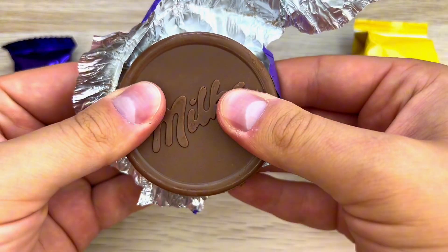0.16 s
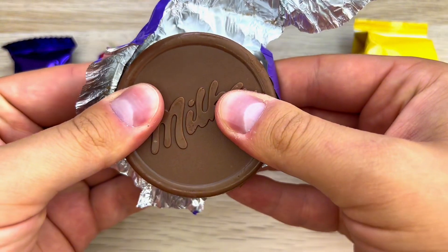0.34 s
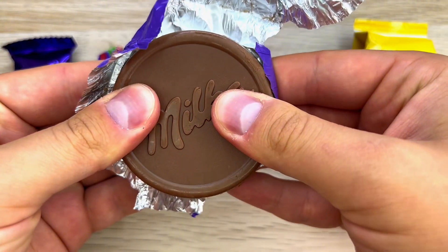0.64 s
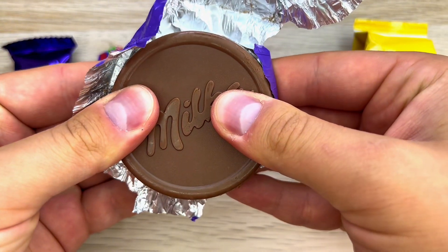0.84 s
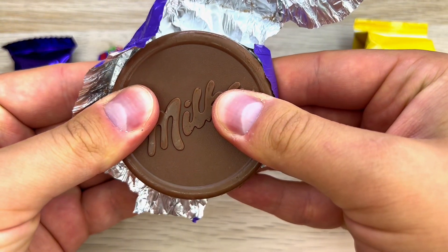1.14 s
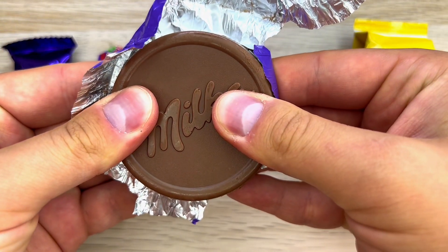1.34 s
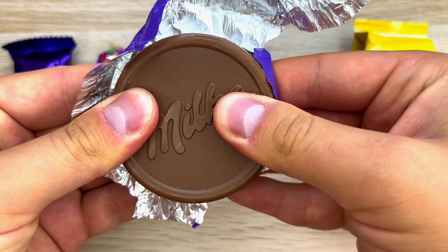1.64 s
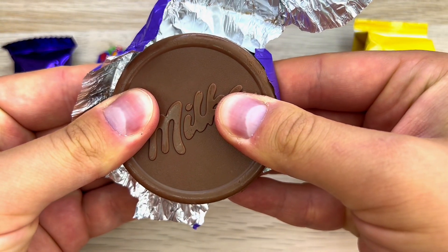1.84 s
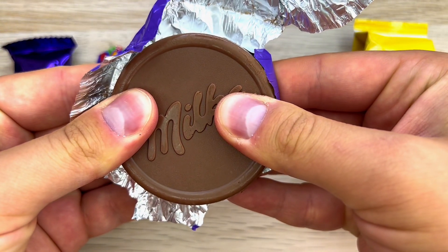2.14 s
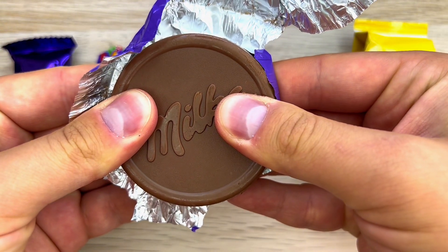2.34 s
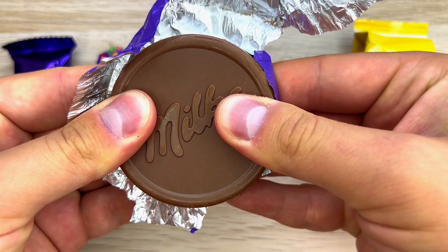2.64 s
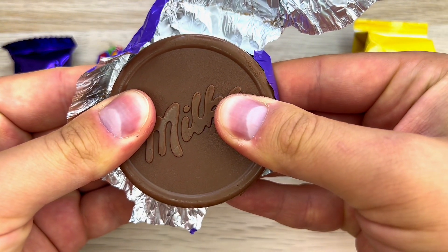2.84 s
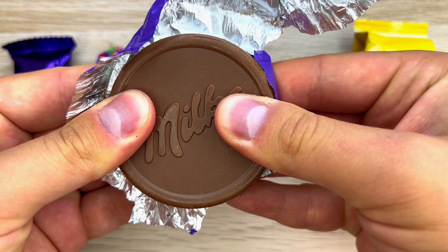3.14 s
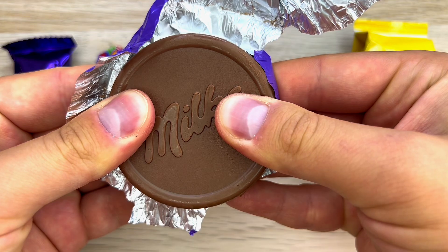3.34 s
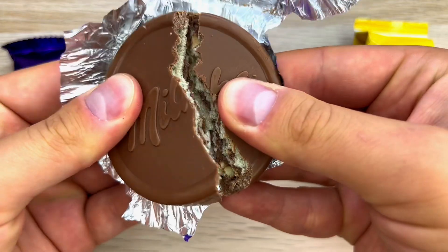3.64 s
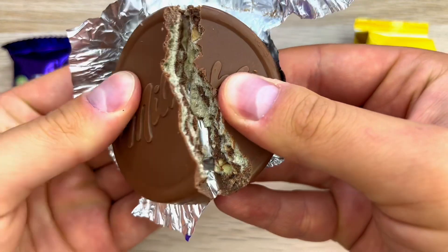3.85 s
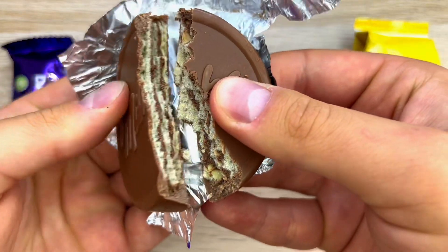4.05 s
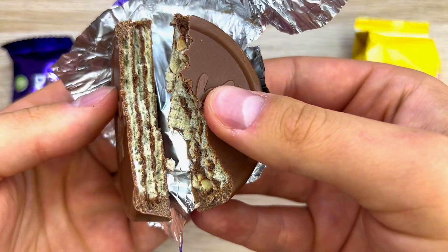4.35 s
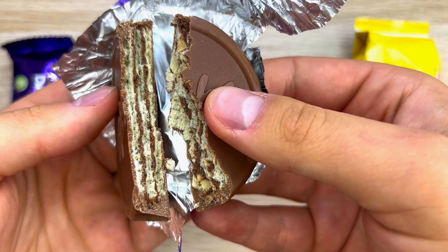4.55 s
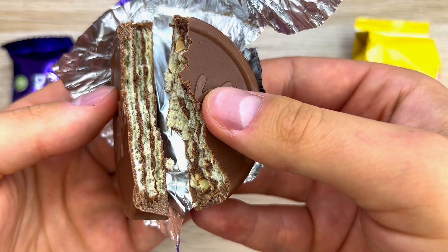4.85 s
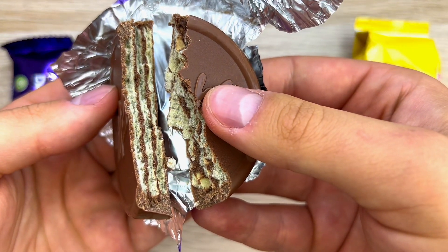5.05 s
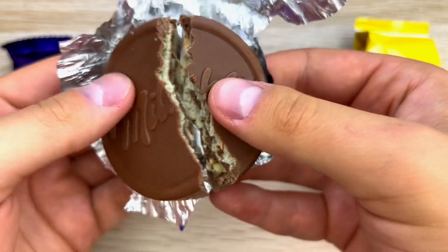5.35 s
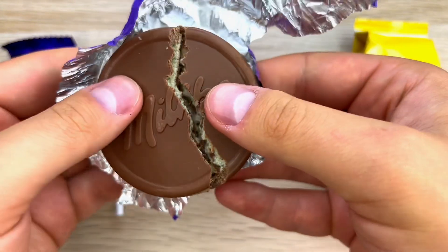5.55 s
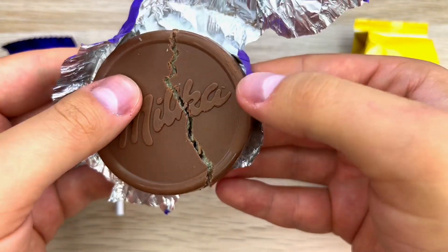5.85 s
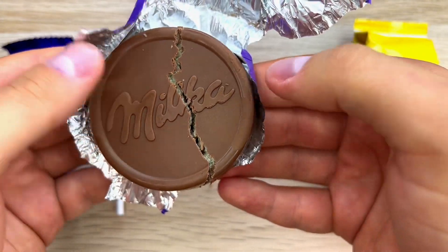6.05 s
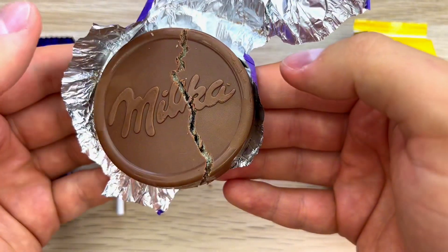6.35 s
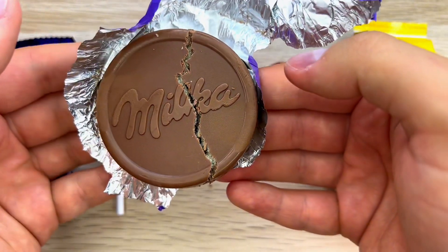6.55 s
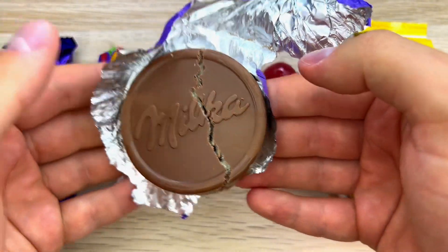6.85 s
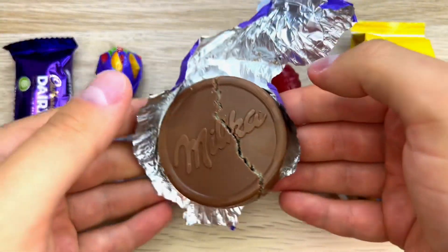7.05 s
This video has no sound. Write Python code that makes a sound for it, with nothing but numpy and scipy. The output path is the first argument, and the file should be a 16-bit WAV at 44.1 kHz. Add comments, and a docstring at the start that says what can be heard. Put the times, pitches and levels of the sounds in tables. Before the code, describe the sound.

Crisp foil crackles under pressing fingers, a chocolate wafer snaps and crunches apart, then is pushed back with clicks and a brief slide, in a quiet room.

```python
"""A quiet room, close under a pair of microphone ports: two hands bend, snap and fold back a chocolate wafer in foil.
Low hum and steady hiss are shaped noise; soft hand thuds are short low tones with scuffing noise.
Sliding is a swish of tiny slips that rings the hollows under the foil.
Crackle and wafer crunches are crowds of small buckles; sharp snaps are single noise bursts that ring the foil.
"""
import sys
import numpy as np
from scipy import signal
from scipy.fft import rfft, irfft, next_fast_len
from scipy.io import wavfile
from scipy.ndimage import uniform_filter1d

SR = 44100
rng = np.random.default_rng(int(sys.argv[2]) if len(sys.argv) > 2 else 0)


def transcribe(u):
    """Save the signal u as a 16-bit wav file named by the first command-line argument.

    u: samples, shape (n,) or (channels, n), limited to [-1, 1]; the rate is SR.
    q: integer samples, one column per channel.
    """
    v = np.clip(np.atleast_2d(u).T, -1, 1)
    q = np.round(v * 32767).astype(np.int16)
    wavfile.write(sys.argv[1], SR, q)


N = 317079  # length in samples

# Low room hum: (frequency [Hz], relative level [dB per Hz])
HUM_TONE = [(24, -35), (40, 8), (203, -3), (257, -6.5), (490, -14), (593, -14.5), (790, -21.5),
            (1100, -15.5), (2000, -32), (22000, -120)]
# How loud the hum is in the port sum: (time [s], level [dB])
HUM_LEVEL = [(5.5, -59), (5.9, -65.5)]
# Steady air noise: (frequency [Hz], relative level [dB per Hz])
HISS_TONE = [(710, -36), (1200, -7), (1680, 1), (1890, -1.5), (2590, -2.5), (5110, -9.5), (6090, -2),
             (7180, -11), (9190, -12), (11500, -13.5), (12200, -57.5)]
HISS_DB = -65  # level in the port sum
# Port difference against port sum for hum and hiss: (frequency [Hz], level [dB])
ROOM_PORTS = [(60, -14.5), (130, -4), (290, 1), (640, 12), (1410, -1), (3100, -2.5), (6820, -12.5),
              (15000, 12.5)]
# Port difference against port sum for a near source: (frequency [Hz], level [dB], phase [rad])
NEAR_PORTS = [(170, -4.5, -0.5), (520, -5, -2), (876, -5.5, -1.5), (1200, -8, -3), (1900, -36, 2),
              (2600, -8.5, -4), (2950, -2.5, -5.5), (3300, -11, -3.5), (3840, -7, -6), (4500, -1.5, -8),
              (5170, 3, -12.5), (5500, -10.5, -10.5), (6257, -13.5, -7.5), (7880, -17.5, -8),
              (10600, 1.5, -8), (12700, 11.5, -8), (16000, 22.5, -6.5), (15580, 26.5, -22.5)]
EDGE_HZ = 16800  # upper band limit

# Palms and wafer pushing air: (middle time [s], tone peak [dB], pitch at the middle [Hz])
THUDS = [(0.17, -39, 170), (3.445, -28, 145), (3.464, -32.5, 85), (3.48, -41, 150), (3.493, -31, 387),
         (3.52, -44, 73), (5.171, -39, 263), (5.302, -36, 170), (5.366, -32, 112), (5.386, -30.5, 237),
         (5.468, -31.5, 185), (5.484, -36.5, 90), (5.506, -25, 310), (5.528, -36.5, 90),
         (6.13, -44.5, 89.3), (6.915, -48, 300), (7.073, -43, 296), (7.1, -31, 265), (7.115, -37, 170)]

# Wafer and fingers sliding over the foil, one list a stroke: (time [s], level [dB])
SLIDES = [
    [(6.02, -56), (6.028, -43.5), (6.08, -29), (6.101, -20.5), (6.132, -47), (6.198, -50), (6.287, -78)],
    [(6.8, -50.5), (6.815, -48.5), (6.84, -33.5), (6.872, -44.5), (6.88, -38), (6.953, -36.5),
     (6.959, -25.5), (6.99, -40), (7.04, -45)],
    [(7.04, -46.5), (7.07, -42), (7.11, -39), (7.25, -49)],
]
# Colour of a tiny slip: (frequency [Hz], relative level [dB per Hz])
SLIP_TONE = [(180, -38), (300, -22), (713, -3), (1120, -7.5), (1390, -2.5), (4910, -1), (8220, 4),
             (11500, -3), (12500, -32), (16000, -33.5)]
# Hollows under the loose foil, first pinched shut, then laid in the palms:
# (base frequency [Hz], width [Hz], base level [dB])
HOLLOWS = [
    [(788, 100, 12.5), (1460, 53, 16), (3010, 160, 8), (4040, 130, 8)],
    [(1654, 91, 19.5), (1992, 200, 13), (3100, 110, 8), (3480, 113, 11)],
]
LAID_DOWN_S = 6.5  # time of the change from pinched to laid
# Hands closing and opening the hollows: (time [s], pitch factor [1], added level [dB])
CUPPING = [(6.02, 1.3, -5), (6.08, 0.96, -1), (6.1, 1.0, 5.5), (6.2, 0.98, -5.5), (6.82, 0.99, -10.5),
           (6.92, 0.98, 3.5), (6.96, 1.0, 0), (7.0, 1.02, -11.5), (7.11, 0.95, 4), (7.19, 1.05, 2.5)]

# Fingers pressing the foil, one list for bending and one for folding back:
# (time [s], bright crackle level [dB], part under 2.4 kHz against bright crackle [dB])
PRESSING = [
    [(0.0, -42.5, -15), (0.51, -56, -8.5), (0.75, -39.5, -6.5), (0.94, -50, -16.5), (1.55, -51, -17.5),
     (1.83, -49, -22), (2.18, -50.5, -19), (2.87, -39, -24), (2.98, -37, -31), (3.45, -42.5, -12.5),
     (3.98, -56.5, -12), (4.24, -65.5, -24)],
    [(5.145, -64, -20), (5.211, -62.5, -8.5), (5.333, -44, -13.5), (5.383, -39, -8.5), (5.457, -48, 5),
     (5.655, -47.5, -3), (5.789, -46, -11.5), (5.857, -61, -12), (5.97, -56, -8.5)],
]
# Wafer and crumpled foil crunching:
# (time of the top [s], level [dB], gathering time [s], settling time [s], part under 2.4 kHz against level [dB])
CRUNCHES = [(.165, -30.5, 0.012, 0.033, -23), (0.64, -29, 0.037, 0.022, -24),
            (0.721, -36, 0.015, 0.016, 3.5), (0.911, -33, 0.028, 0.014, -23),
            (1.245, -36.5, 0.022, 0.021, -8.5), (1.757, -34.5, 0.015, 0.061, -43),
            (1.884, -30.5, 0.026, 0.025, -15.5), (2.396, -37.5, 0.023, 0.084, -25.5),
            (2.651, -36, 0.03, 0.14, -19), (3.337, -26, 0.015, 0.055, -20),
            (3.436, -14.5, 0.012, 0.014, -6), (3.406, -16.5, 0.013, .014, -18),
            (3.647, -42.5, 0.1, 0.2, -7.5), (3.906, -42, 0.012, 0.086, -3),
            (4.126, -39, 0.025, 0.0098, 7.5), (5.16, -31.5, 0.0056, 0.014, 2),
            (5.257, -36.5, 0.016, 0.052, -4), (5.379, -27, 0.034, 0.0068, -3),
            (5.503, -33, 0.0032, 0.021, 5), (5.667, -14, 0.0051, 0.0045, -13.5),
            (5.771, -31, 0.037, 0.025, -20), (6.914, -36, 0.028, .03, -8.5)]
# Swarm of small buckles around a big one: levels for a 0 dB snap or pop, and dB of swarm per dB of peak
SWARM_SNAP_DB, SWARM_POP_DB, SWARM_SLOPE = -28, -22.5, 1.1
BUILD_S, SETTLE_S = 0.0014, 0.014  # the swarm gathers before the big buckle and settles after it

# Overall colour of the foil in the port sum: (frequency [Hz], relative level [dB per Hz])
FOIL_TONE = [(900, -19), (2000, -3.5), (2440, 5.5), (2990, 7.5), (3360, 4), (3740, 8), (4060, 3),
             (5120, 2.5), (5960, 6), (11000, 3.5), (13700, -8), (15800, -12.5), (17000, -39.5)]
# Larger patches of foil and wafer that give way: (time [s], peak [dB], ring [Hz])
POPS = [(0.0002, -33, 2056), (0.0541, -39, 2160), (0.1057, -38, 1460), (0.1143, -36, 2110),
        (0.1638, -17.5, 2130), (0.527, -35.5, 1610), (0.5326, -29, 2124), (0.6079, -22.5, 2140),
        (0.6569, -27, 1616), (0.6947, -28, 2150), (0.7115, -28.5, 700), (0.8618, -25.5, 2060),
        (0.9861, -37, 1850), (1.2301, -23, 1546), (1.3541, -40, 1580), (1.8167, -37.5, 1530),
        (1.8742, -25.5, 690), (2.0481, -26, 1115), (2.0847, -38, 1160), (2.3873, -37.5, 2160),
        (2.6849, -36.5, 603), (2.7083, -30.5, 1830), (2.8334, -38, 1690), (2.9294, -39, 1680),
        (2.9627, -36, 1867), (3.1578, -20, 974), (3.3419, -26.5, 2205), (3.4228, -17, 1590),
        (3.4334, -12.5, 1516), (3.5056, -17.5, 694), (3.6459, -14, 1583), (3.8282, -36, 1085),
        (3.8591, -36, 2247), (3.896, -22.5, 1626), (3.9414, -13.5, 1339), (3.9852, -13.5, 1420),
        (4.1126, -32, 980), (4.9237, -42, 2060), (5.152, -23.5, 1070), (5.1571, -22, 1038),
        (5.2903, -12.5, 777.5), (5.3667, -25.5, 673), (5.3732, -27, 678), (5.4248, -19, 1401),
        (5.4443, -12, 1071), (5.4555, -21.5, 704), (5.4602, -24, 715), (5.503, -21.5, 855),
        (5.5229, -24, 910), (5.5381, -23, 1207), (5.5989, -24.5, 844), (5.6272, -15, 1620),
        (5.6635, -14, 1510), (5.7394, -25.5, 1660), (5.7612, -25.5, 1572), (5.7758, -29.5, 1650),
        (6.0984, -14, 788.5), (6.8475, -23, 1620), (6.876, -25, 1760), (6.911, -21.5, 1990),
        (6.9554, -17.5, 2100)]
# Creases that buckle: (time [s], peak [dB], ring [Hz])
SNAPS = [(0.0004, -13.5, 3035), (0.0549, -16, 6820), (0.085, -15.5, 7890), (0.1069, -9, 6850),
         (0.1149, -21, 3953), (0.1254, -18.5, 7930), (0.156, -18.5, 8000), (0.1655, -2, 6720),
         (0.2113, -18.5, 8000), (0.2283, -20.5, 9030), (0.2802, -9.5, 6050), (0.299, -12, 7900),
         (0.3021, -19, 10700), (0.3114, -15.5, 7180), (0.3444, -13.5, 9730), (0.4295, -26, 4710),
         (0.4927, -36, 6015), (0.5122, -30.5, 6034), (0.528, -26.5, 9210), (0.5332, -21.5, 3790),
         (0.547, -21.5, 7950), (0.5599, -20.5, 3633), (0.6086, -10, 7960), (0.6186, -20.5, 6710),
         (0.631, -10.5, 6990), (0.6325, -12.5, 6930), (0.6382, -10.5, 7280), (0.6445, -13, 6880),
         (0.71, -19, 8030), (0.7123, -4, 11660), (0.725, -24.5, 7960), (0.7416, -20.5, 7580),
         (0.7995, -14.5, 7980), (0.8173, -23.5, 9200), (0.8347, -25.5, 6730), (0.8627, -7.5, 7960),
         (0.9736, -27.0, 6620), (0.984, -20.5, 6400), (0.987, -25.5, 3176), (1.0166, -29, 7000),
         (1.0711, -20.5, 6850), (1.0817, -19.5, 7920), (1.087, -19.5, 11650), (1.1453, -21.5, 5974),
         (1.166, -11, 9560), (1.2082, -25.0, 7800), (1.227, -21.5, 9620), (1.2303, -23, 2685),
         (1.2483, -17, 2956), (1.27, -22.5, 2820), (1.3086, -25.5, 6660), (1.3385, -27, 7100),
         (1.3547, -25.5, 2470), (1.4549, -27, 7800), (1.4589, -28.5, 7260), (1.4761, -25.5, 10480),
         (1.4832, -31, 6940), (1.5574, -22, 10750), (1.561, -24.5, 9280), (1.568, -23.5, 10590),
         (1.5765, -26.5, 10850), (1.6547, -28.5, 6960), (1.672, -19.5, 6970), (1.6744, -22.5, 6780),
         (1.7009, -21, 11530), (1.7353, -23.5, 7300), (1.744, -16, 7230), (1.7766, -24, 7200),
         (1.8177, -9, 6850), (1.866, -20.5, 7010), (1.872, -12.5, 3480), (1.884, -19, 7760),
         (1.889, -24.5, 7900), (1.907, -18, 7820), (1.9312, -15.5, 7070), (1.9615, -25, 7170),
         (1.988, -28, 8000), (2.0014, -31, 7320), (2.0476, -25.5, 2664), (2.0807, -27, 9170),
         (2.0863, -15, 8910), (2.1288, -24.5, 7230), (2.1652, -31.5, 11050), (2.1707, -25.5, 11120),
         (2.18, -29, 7320), (2.2248, -37, 6400), (2.234, -32.5, 7100), (2.2532, -26.5, 8400),
         (2.283, -29.5, 7110), (2.3007, -28.5, 7780), (2.33, -24, 5790), (2.3387, -24.5, 7980),
         (2.3511, -18.0, 6550), (2.3835, -13, 6440), (2.3883, -11.5, 2775), (2.4005, -17.5, 7990),
         (2.426, -21.5, 7060), (2.4533, -16, 6630), (2.4708, -21, 6530), (2.5057, -18.5, 5790),
         (2.613, -18.5, 7330), (2.6296, -18, 6720), (2.6893, -20.5, 6850), (2.6917, -21.5, 11600),
         (2.7088, -10, 11280), (2.7829, -18, 7170), (2.8129, -12.5, 7460), (2.8339, -19, 3637),
         (2.839, -15, 6000), (2.852, -20, 6010), (2.93, -18.5, 7040), (2.962, -11, 7460),
         (3.0025, -15, 5910), (3.053, -17.5, 10330), (3.1293, -23.5, 7400), (3.1402, -26.5, 7000),
         (3.1512, -12.5, 10390), (3.157, -5.5, 3617), (3.173, -21, 7210), (3.2065, -19.5, 8610),
         (3.231, -20, 8690), (3.2834, -14, 8710), (3.3133, -16, 6360), (3.326, -15.5, 6940),
         (3.3285, -11.5, 6890), (3.332, -13.5, 6940), (3.3396, -14, 6890), (3.342, -12, 6760),
         (3.3713, -10, 6750), (3.396, -7, 6610), (3.4231, -4.5, 5900), (3.4264, -5.0, 9490),
         (3.434, -6.5, 6290), (3.4415, -2, 8740), (3.4599, -11.5, 3610), (3.5067, -19.0, 2950),
         (3.5206, -22, 7010), (3.585, -27, 4870), (3.5905, -14.5, 7890), (3.5936, -8, 4840),
         (3.598, -10, 6580), (3.6027, -22, 7430), (3.6413, -11.5, 8590), (3.646, -6.5, 2412),
         (3.6889, -21.5, 7920), (3.7123, -18, 3777), (3.769, -21.5, 6360), (3.82, -22.5, 7880),
         (3.8244, -13.5, 10000), (3.8602, -13, 3770), (3.8865, -21.0, 7120), (3.8945, -12, 9410),
         (3.902, -15, 10770), (3.9295, -24, 7120), (3.9418, -10.5, 2305), (3.9851, -6, 5790),
         (4.0823, -21, 7800), (4.0865, -14.5, 8090), (4.1145, -11, 6580), (4.162, -29.5, 7980),
         (4.2072, -35, 7930), (4.411, -37, 7700), (4.5114, -38, 3070), (4.9243, -38.5, 2470),
         (5.1516, -28, 9230), (5.1587, -19, 10840), (5.1956, -21, 7940), (5.2016, -11.5, 6320),
         (5.2515, -17.0, 6010), (5.2574, -3, 5500), (5.291, -10.5, 3634), (5.307, -13.0, 5920),
         (5.3094, -14, 6700), (5.3245, -9, 8000), (5.378, -16.5, 6720), (5.4253, -9, 2670),
         (5.4443, -10.5, 2366), (5.4546, -13.0, 9000), (5.4591, -17, 4600), (5.4732, -17, 6010),
         (5.5075, -11, 7890), (5.524, -19.5, 7150), (5.5316, -10.5, 4006), (5.548, -10, 6610),
         (5.5667, -16, 3907), (5.623, -15.5, 5410), (5.6281, -20.5, 3470), (5.6562, -10.5, 4786),
         (5.6633, -4.5, 7200), (5.7405, -2.5, 6200), (5.772, -18.0, 7070), (5.7925, -18.5, 8000),
         (6.028, -23, 8070), (6.047, -16, 6160), (6.089, -7.5, 8330), (6.0943, -12, 9260),
         (6.0994, -6, 4065), (6.1008, -4.5, 7240), (6.549, -40.5, 4570), (6.8139, -22.5, 6660),
         (6.876, -18, 3060), (6.9546, -8.5, 3250), (6.9642, -16, 8260)]
ECHO_S, ECHO_DB = 0.0028, -13.5  # the table throws each buckle back


def amp(db):
    """Turns dB into a gain."""
    return 10 ** (np.asarray(db) / 20)


def evened(x):
    """Scales a signal to rms 1."""
    return x / np.sqrt(np.mean(x ** 2) + 1e-20)


def slow_noise(span):
    """Slow random drift of rms 1: noise averaged twice over a span of samples."""
    noise = rng.standard_normal(N)
    return evened(uniform_filter1d(uniform_filter1d(noise, span), span))


def read(points, hz, axis=1):
    """Reads one column of a table along log frequency."""
    table = np.transpose(points)
    return np.interp(np.log(hz + 1), np.log(table[0] + 1), table[axis])


def curve(rows):
    """Draws every column of a table against time, sample by sample."""
    s, *columns = np.transpose(rows)
    t = np.arange(N) / SR
    return [np.interp(t, s, c, left=c[0], right=c[-1]) for c in columns]


def during(tables):
    """Gives 1 while one of the gestures lasts, else 0."""
    t = np.arange(N) / SR
    return sum((t > rows[0][0]) & (t <= rows[-1][0]) for rows in tables)


def filtered(x, gain):
    """Multiplies the spectrum of the last axis by gain(Hz)."""
    size = next_fast_len(x.shape[-1] + 2048)
    spectrum = rfft(x, size) * gain(np.fft.rfftfreq(size, 1 / SR))
    return irfft(spectrum, size)[..., :x.shape[-1]]


def mode(hz, ring_hz, q):
    """One resonance that rings only after its push, with gain 1 at its own pitch."""
    return 1 / (1 + 1j * q * (hz / ring_hz - ring_hz / (hz + 1e-9)))


def colour(points, size=1024):
    """A filter with the table's spectrum that answers as promptly as possible (minimum phase)."""
    hz = np.abs(np.fft.fftfreq(size, 1 / SR))
    log_gain = np.log(amp(np.maximum(read(points, hz), -70)))
    return np.fft.ifft(np.exp(np.conj(signal.hilbert(log_gain)))).real


def ringing(x, hz, width):
    """A moving resonance of gain 1: shifts the pitch curve to zero, smooths, shifts back."""
    turn = np.exp(2j * np.pi * np.cumsum(hz) / SR)
    r = np.exp(-np.pi * width / SR)
    return 2 * (turn * signal.lfilter([1 - r], [1, -r], x / turn)).real


def hum_and_hiss():
    """Room noise comes from all sides, so port sum and port difference are unrelated noises."""
    out = 0
    for tone, level_db in ((HUM_TONE, curve(HUM_LEVEL)[0]), (HISS_TONE, HISS_DB)):
        a, b = rng.standard_normal((2, N))
        mid = filtered(a, lambda hz: amp(read(tone, hz)))
        side = filtered(b, lambda hz: amp(read(tone, hz) + read(ROOM_PORTS, hz)))
        out = out + amp(level_db) * np.array([mid + side, mid - side]) / np.std(mid)
    return out


def room(x, t60=0.19):
    """Two unrelated dying tails of sparse echoes of random sign; t60 is the time to fall 60 dB [s]."""
    count, gap = 700, 22  # one echo in every gap of 22 samples
    taps = np.zeros((2, gap * count))
    at = gap * np.arange(count) + rng.integers(0, gap, (2, count))
    sign = rng.choice([-1., 1.], at.shape)
    np.put_along_axis(taps, at, sign * amp(-60 * at / SR / t60), 1)
    taps = np.pad(taps, ((0, 0), (300, 0)))  # wait of 300 samples before the tail
    return signal.fftconvolve(x[None], taps / np.linalg.norm(taps[0]), axes=1)[:, :N]


def wandering(x, rad=1.0):
    """The hands move about under the ports, so the phase between them wanders (rms in rad)."""
    turn = slow_noise(900)
    return (signal.hilbert(x, next_fast_len(N))[:N] * np.exp(1j * rad * turn)).real


def thuds(cycles=2.5, rough=0.65, rumble=0.79):
    """Each push is a few soft low cycles that sag in pitch; the skin scuffs along and rumbles on."""
    size = 8192
    out = np.zeros(N + size)
    scuffs = rng.standard_normal((len(THUDS), size))
    for (s, db, hz), start, noise in zip(THUDS, rng.random(len(THUDS)), scuffs):
        u = np.arange(-1, 4, 2 * hz / cycles / SR)[:size]  # the tone lasts from -1 to 1
        tone = np.sin(2 * np.pi * (start + cycles / 2 * (u - 0.064 * u ** 2)))
        tone = np.cos(np.pi * u / 2) ** 2 * tone * (u < 1)
        scuff = evened(filtered(noise, lambda f: mode(f, 2.3 * hz, 0.73) ** 2))[:len(u)]
        rise = np.cos(np.pi * np.minimum(u, 0) / 2) ** 2
        fall = np.exp(-np.maximum(u, 0) / rumble)
        at = round((s - cycles / 2 / hz) * SR)
        out[at:at + len(u)] += amp(db) * (tone + rough * rise * fall * scuff)
    return out[:N]


def slide(per_s=3500, spread_db=1.0):
    """Crowded tiny slips blur into a grainy swish that rings the hollows under the foil."""
    size = amp(spread_db * rng.exponential(1, N))
    slips = size * (rng.random(N) < per_s / SR) * rng.choice([-1., 1.], N)
    drift = slow_noise(250)
    swish = signal.oaconvolve(slips * amp(0.57 * drift), colour(SLIP_TONE))[:N]
    pitch, depth_db = curve(CUPPING)

    def in_hollows(hollows):
        """The swish plus its ringing in each hollow."""
        rings = sum(amp(db + depth_db) * ringing(swish, hz * pitch, width) for hz, width, db in hollows)
        return evened(swish + rings)

    pinched, laid = in_hollows(HOLLOWS[0]), in_hollows(HOLLOWS[1])
    level = during(SLIDES) * amp(curve(sum(SLIDES, []))[0])
    return level * np.where(np.arange(N) < LAID_DOWN_S * SR, pinched, laid)


def bounced(rows):
    """Adds the table's echo and scales each row to peak 1."""
    late = round(ECHO_S * SR)
    rows = rows + amp(ECHO_DB) * np.pad(rows, ((0, 0), (late, 0)))[:, :rows.shape[1]]
    return rows / np.abs(rows).max(1, keepdims=True)


def knocks(low_hz, q, size=1536):
    """One row a larger patch: a softer noise burst that rings lower down."""
    t = np.arange(size) / SR
    low_hz = low_hz[:, None]
    push = rng.standard_normal((len(low_hz), size))
    push = push * (1 - np.exp(-(t / 0.00019) ** 2)) * amp(-60 * t / 0.016)
    return bounced(filtered(push, lambda hz: mode(hz, low_hz, 0.55) ** 2 * (0.27 + mode(hz, low_hz, q))))


def cracks(ring_hz, t60, broad, size=1536):
    """One row a buckle: a sudden dying burst rings a flat of foil; the sheet shivers on a little."""
    t = np.arange(size) / SR
    ring_hz = ring_hz[:, None]
    kick = rng.standard_normal((len(ring_hz), size)) * (1 - np.exp(-(t / 0.00039) ** 2))
    shiver = amp(-20.5 - 60 * t / 0.042)
    kick = kick * (amp(-60 * t / t60) + shiver)
    rung = filtered(kick, lambda hz: broad + 0.31 * mode(hz, ring_hz, 0.88) + mode(hz, ring_hz, 8.6))
    return bounced(signal.fftconvolve(rung, colour(FOIL_TONE)[None], axes=1)[:, :size])


def swell(t, gathers, settles):
    """Grows towards time 0 and dies away after it, with one time constant [s] for each side."""
    return np.exp(-np.abs(t) / np.where(t < 0, gathers, settles))


def swarms():
    """Bright and low crackle levels: finger pressure, a swarm around every snap and pop, and crunches."""
    press_db, share_db = curve(sum(PRESSING, []))
    power = during(PRESSING) * amp([press_db, press_db + share_db]) ** 2 + 1e-20
    shape = swell(np.arange(-SR // 4, SR // 4 + 1) / SR, BUILD_S, SETTLE_S)
    # snaps feed the bright crackle, pops the low one
    for k, (rows, swarm_db) in enumerate(((SNAPS, SWARM_SNAP_DB), (POPS, SWARM_POP_DB))):
        s, peak_db, _ = np.transpose(rows)
        at = np.round(s * SR).astype(int)
        hits = np.bincount(at, amp(swarm_db + SWARM_SLOPE * peak_db), N)
        power[k] += signal.oaconvolve(hits, shape, "same") ** 2
    for top, db, gathers, settles, part_db in CRUNCHES:
        near = slice(max(round((top - 0.5) * SR), 0), round((top + 0.5) * SR))
        crunch = swell(np.arange(N)[near] / SR - top, gathers, settles)
        power[:, near] += (amp([[db], [db + part_db]]) * crunch) ** 2
    return np.sqrt(power)


def crackle(count=24, spread_db=2.0):
    """Many small buckles of random size, in clumps; harder work crowds them."""
    bright, low = swarms()
    per_s = 480 * (bright / amp(-47.0)) ** 0.42
    u = rng.random((count, 2))
    high_sounds = cracks(5200 * 2.15 ** u[:, 0], 0.006, broad=0.06)
    low_sounds = knocks(700 * 5.5 ** u[:, 1], 4.2)
    clump = slow_noise(300)
    size = amp(spread_db * np.minimum(rng.exponential(1, N), 2.8) + 1.5 * clump)
    size = size * (rng.random(N) < per_s / SR)
    kind = rng.integers(0, count, N)  # which of the ready-made sounds each buckle uses

    def layer(sizes, sounds):
        """Places the sounds at the buckles, at an even overall level."""
        placed = [signal.oaconvolve(sizes * (kind == k), row[:1400])[:N] for k, row in enumerate(sounds)]
        return evened(sum(placed))

    high_layer = layer(size / np.sqrt(per_s), high_sounds)
    low_layer = layer(size ** 0.6 / np.sqrt(per_s), low_sounds)  # low patches differ less in size
    return bright * high_layer + low * low_layer


def snaps():
    """The loud single buckles and pops; a bigger snap tears through more creases and lasts longer."""
    _, snap_db, snap_hz = np.transpose(SNAPS)
    t60 = 0.0049 * amp(0.18 * (snap_db + 11.0))[:, None]  # seconds to fall 60 dB
    sounds = [*cracks(snap_hz, t60, broad=0.17), *knocks(np.transpose(POPS)[2], 6.3)]
    out = np.zeros(N + SR)
    for (s, peak_db, _), sound in zip(SNAPS + POPS, sounds):
        out[round(s * SR):][:len(sound)] += amp(peak_db) * sound
    return out[:N]


def scene():
    """Adds all layers as port sum (mid) and port difference (side), folded out to left and right."""
    near = snaps() + crackle() + slide()
    tail_mid, tail_side = amp(-16.5) * room(near)
    side = filtered(wandering(near) + 1.7 * tail_side,
                    lambda hz: amp(read(NEAR_PORTS, hz)) * np.exp(1j * read(NEAR_PORTS, hz, axis=2)))
    mid = near + tail_mid + thuds()
    return np.array([mid + side, mid - side]) + hum_and_hiss()


def record(dry):
    """Cuts off peaks beyond full scale, then removes the treble above the band limit."""
    edge = signal.firwin(511, EDGE_HZ, window=("kaiser", 12), fs=SR)
    return signal.oaconvolve(np.clip(dry, -1, 1), edge[None], "same")


dry = scene()
out = record(dry)
transcribe(out)
```